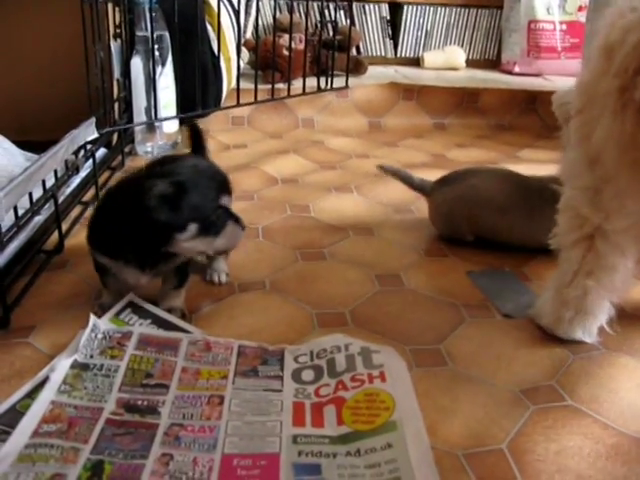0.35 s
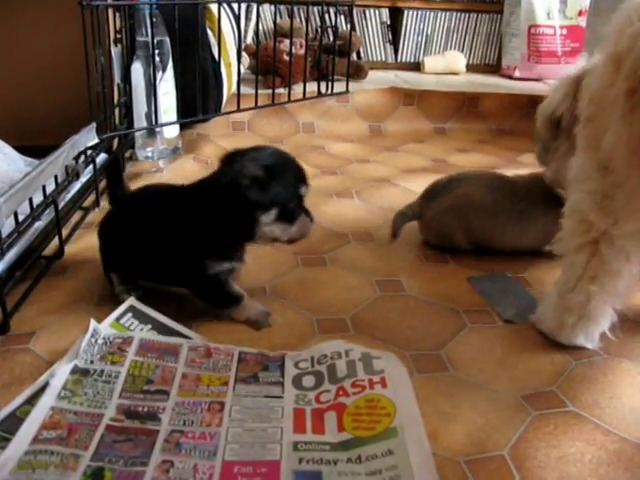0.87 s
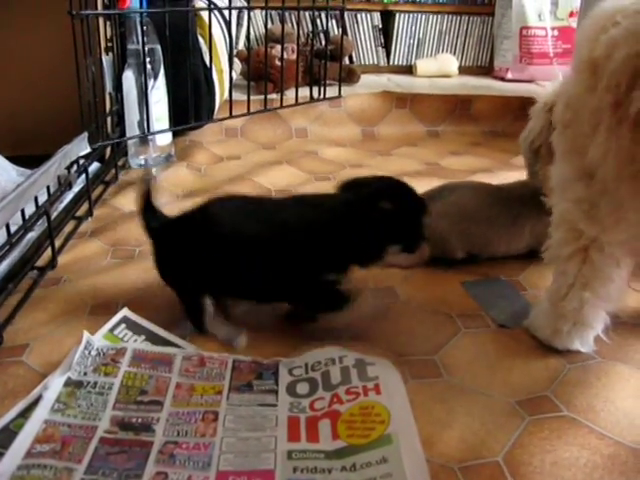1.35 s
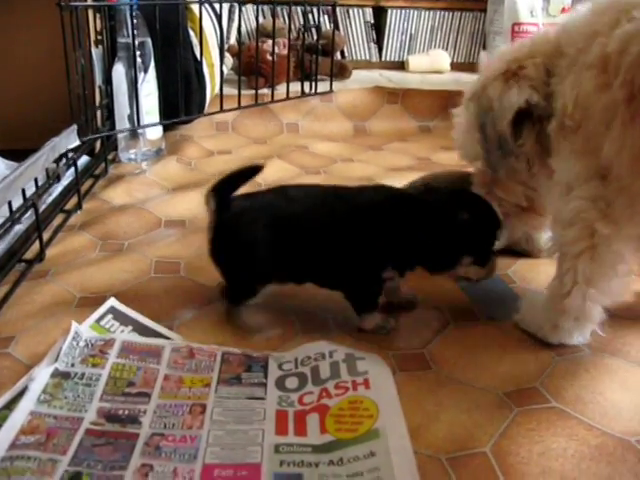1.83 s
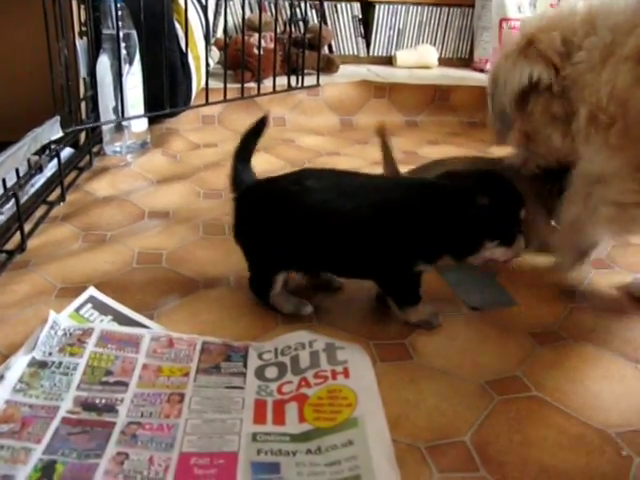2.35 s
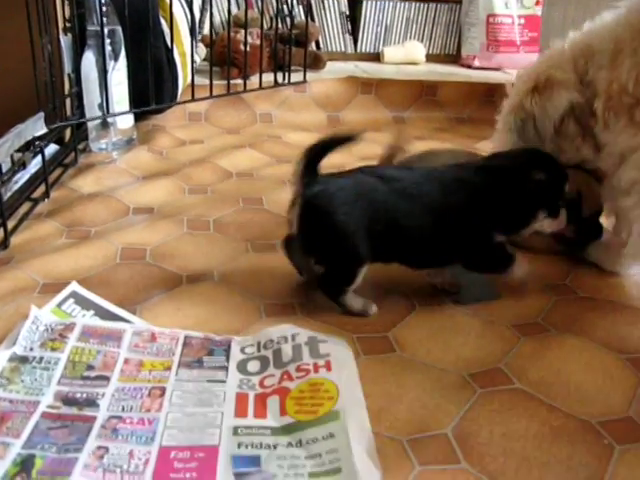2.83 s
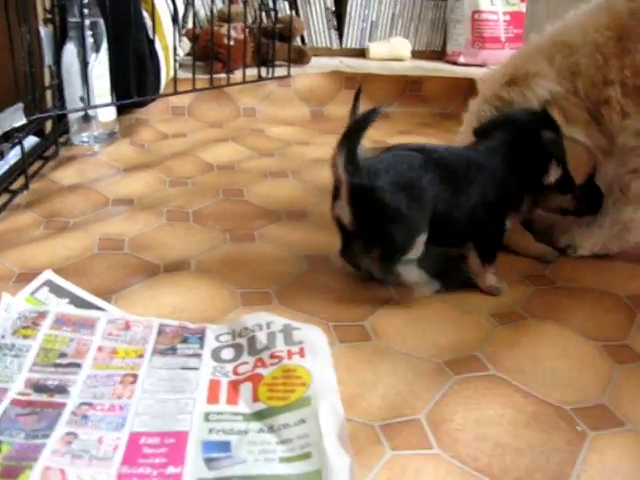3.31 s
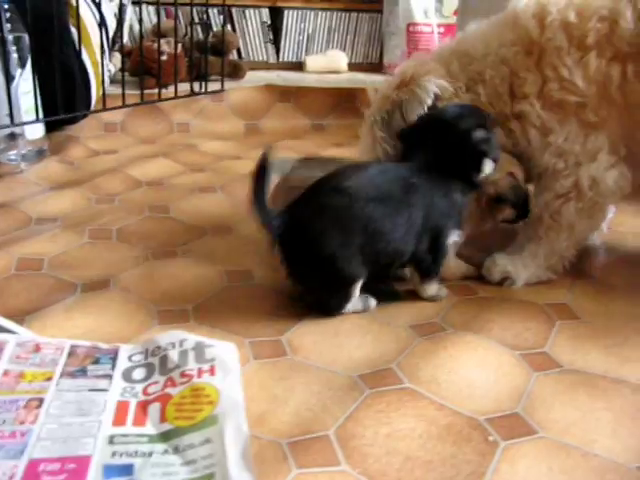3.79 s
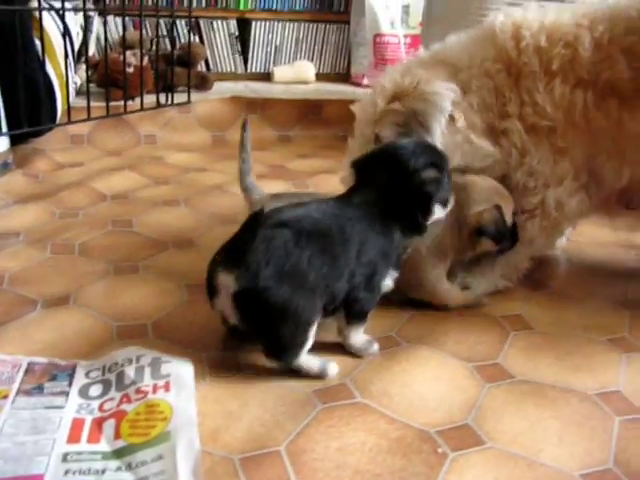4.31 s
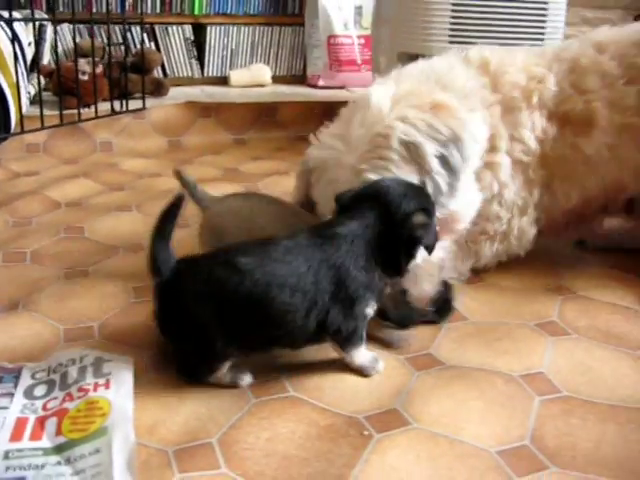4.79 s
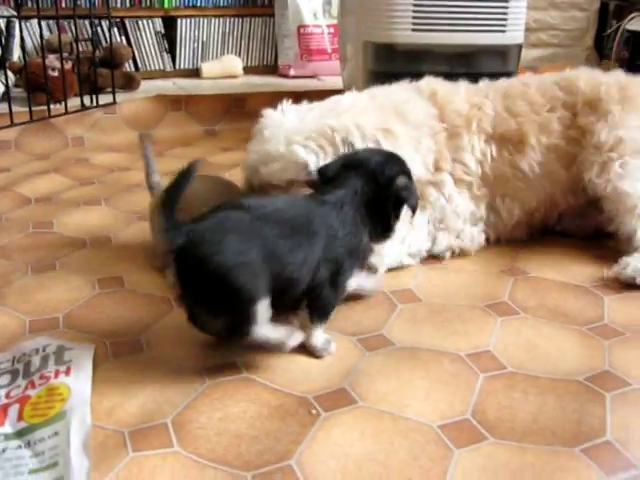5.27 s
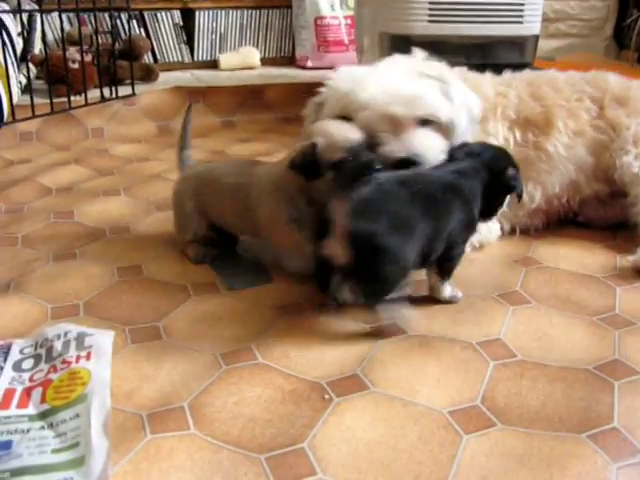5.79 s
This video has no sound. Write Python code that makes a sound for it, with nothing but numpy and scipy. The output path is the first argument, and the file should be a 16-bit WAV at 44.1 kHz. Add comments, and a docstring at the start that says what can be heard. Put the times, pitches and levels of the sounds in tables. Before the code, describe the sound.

Small puppies yip softly indoors amid clicking claws, soft thuds and scuffles on vinyl, peaking in sharp knocks and a wavering cry.

```python
"""Puppies squeak and whine while they tumble around a dog on a vinyl floor in a small room.
Each squeak is a few harmonics on a shaky pitch. Claws tick as short ringing modes, paws thud as
low swings that die fast, and fur and pads scuff as dense noisy grains. The dog sniffs once.
The room adds a short echo tail, and one microphone hisses under it all."""
import sys
import numpy as np
from scipy import signal
from scipy.fft import rfft, irfft
from scipy.io import wavfile
from scipy.ndimage import uniform_filter1d

SR = 44100
rng = np.random.default_rng(int(sys.argv[2]) if len(sys.argv) > 2 else 0)


def gain_from_db(level_db):
    """Turn a decibel level (scalar or array-like) into a linear amplitude factor."""
    decades = np.asarray(level_db, float) / 20
    return 10 ** decades


def file_out(sig):
    """Save sig as 16-bit WAV at sys.argv[1]."""
    # one column per channel
    cols = np.atleast_2d(sig).T
    # limit, then scale
    lim = np.clip(cols, -1, 1)
    pcm = np.round(lim * 32767).astype(np.int16)
    wavfile.write(sys.argv[1], SR, pcm)


N = 260190  # samples, 5.9 s


def evened(x):
    """Scales to rms 1."""
    return x / np.sqrt(np.mean(x ** 2) + 1e-20)


def add(mix, start_s, sound):
    """Mixes a sound in at its start time."""
    part = mix[round(start_s * SR):][:len(sound)]
    part += sound[:len(part)]


def coloured(x, points):
    """Filters by a spectrum of (Hz, dB) points, joined on a log-frequency axis."""
    point_hz, point_db = np.transpose(points)
    hz = np.fft.rfftfreq(len(x), 1 / SR)
    gain_db = np.interp(np.log(hz + 1), np.log(point_hz + 1), point_db)
    return irfft(rfft(x) * gain_from_db(gain_db), len(x))


def wander(n, span):
    """Smooth random drift of rms about 1 that changes over span samples."""
    noise = rng.standard_normal(n + 2000)
    smooth = uniform_filter1d(uniform_filter1d(noise, span), span)
    return evened(smooth)[1000:n + 1000]


def squeak(rows, overtones_db, rasp_db):
    """Tiny vocal folds: a few harmonics on a shaky pitch, fluttering in strength and hoarser toward the end."""
    # samples over which each curve rounds its corners: (pitch, level)
    pitch_ease, level_ease = (160, 300)
    jitter, flutter_db = 0.004, 1.8  # rms share of the pitch; rms dB
    start_s, pitch_hz, level_db = np.transpose(rows)
    t = np.arange(start_s[0], start_s[-1], 1 / SR)
    hz = uniform_filter1d(np.interp(t, start_s, pitch_hz), size=pitch_ease, mode="nearest")
    tone_db = uniform_filter1d(np.interp(t, start_s, level_db), size=level_ease, mode="nearest")
    phase = 2 * np.pi * np.cumsum(hz * (1 + jitter * wander(len(t), 120))) / SR
    progress = (t - start_s[0]) / (start_s[-1] - start_s[0])
    second_db, third_db, fourth_db = overtones_db
    fifth_db = fourth_db - 10
    voice = 0
    for number, db in enumerate([0, second_db, third_db, fourth_db, fifth_db], start=1):
        flutter = gain_from_db(flutter_db * wander(len(t), 200))
        # rasp grows through the call and with the harmonic number
        rasp = gain_from_db(rasp_db) * number * 2 * progress * wander(len(t), 30)
        tone = np.sqrt(2) * gain_from_db(tone_db + db) * np.sin(number * phase)
        voice = voice + (flutter + rasp) * tone
    return start_s[0], voice * signal.windows.tukey(len(t), 0.15)


def puppies():
    """Every squeak at its time, each with its own overtones and hoarseness."""
    # course of each squeak, one list a squeak: start_s [s], pitch_hz [Hz], level_db of the lowest tone [dB rms]
    squeaks = [
        [(0.065, 398, -58), (0.075, 435.1, -55), (0.089, 493, -44.5), (0.101, 556, -45), (0.117, 562, -45.5),
         (0.129, 550, -68), (0.135, 544.9, -56)],
        [(0.94, 826, -57), (0.952, 825, -50.5), (0.988, 967, -44), (0.996, 976, -57), (1.022, 925, -55),
         (1.046, 709, -41), (1.07, 520, -59)],
        [(1.24, 810, -81), (1.252, 824, -39.5), (1.26, 856, -40.5), (1.268, 833.3, -81)],
        [(1.615, 1136, -58), (1.623, 1142, -43.5), (1.649, 1155, -51), (1.663, 1192, -38), (1.677, 1286, -46),
         (1.709, 1196, -53), (1.72, 1204, -66)],
        [(1.785, 693, -50), (1.795, 678, -47), (1.819, 754, -43.5), (1.859, 779, -47), (1.865, 730, -46.5),
         (1.881, 571, -48.5), (1.895, 506, -41)],
        [(2.22, 526, -67), (2.234, 511.5, -49.5), (2.252, 479, -54), (2.296, 590.6, -44.5), (2.31, 615, -51),
         (2.364, 594, -50.5), (2.4, 577, -59)],
        [(2.735, 970, -55), (2.745, 1034, -37), (2.763, 1090, -34.5), (2.791, 1234, -39.5),
         (2.825, 1194, -42.5), (2.853, 975, -39.5), (2.87, 900, -63)],
        [(3.04, 730.0, -53), (3.052, 729, -38), (3.076, 772, -35), (3.102, 565.4, -43), (3.148, 583.5, -51),
         (3.152, 568, -48), (3.18, 507, -51)],
        [(4.485, 890, -64), (4.493, 836, -38.5), (4.511, 695, -35.5), (4.535, 690, -34), (4.547, 747, -60),
         (4.559, 703, -43), (4.575, 680.5, -63)],
        [(4.92, 657, -48), (4.928, 689, -37.5), (4.946, 604, -47), (4.96, 670, -38.5), (4.966, 600, -54),
         (4.99, 592, -46)],
        [(5.355, 1080, -50), (5.375, 1048, -40), (5.421, 1125, -51), (5.441, 1062, -39), (5.471, 840, -37.5),
         (5.515, 896, -34.5), (5.58, 917, -81)],
        [(5.825, 1260, -48), (5.837, 1274, -52), (5.863, 1313, -40), (5.867, 1333, -49), (5.875, 1410, -37),
         (5.887, 1510, -46), (5.9, 1450, -35)],
        [(1.595, 1346, -61), (1.613, 1337, -43), (1.64, 1380, -58)],
        [(0.155, 1669, -76), (0.167, 1610, -43), (0.18, 1580, -73)],
        [(3.462, 847, -59), (3.475, 798, -45), (3.495, 746, -48.5), (3.51, 800, -45.5), (3.527, 970, -55)],
        [(3.59, 1206, -62), (3.61, 1050, -43), (3.63, 926, -44), (3.655, 958, -39)],
        [(3.535, 612, -56), (3.56, 540, -53), (3.61, 546, -49), (3.655, 458, -58)],
        [(4.08, 1126, -56), (4.096, 982, -38.5), (4.128, 996, -40), (4.136, 973, -54), (4.144, 1110, -39),
         (4.156, 1117, -44), (4.19, 950, -40), (4.204, 953, -35), (4.23, 1002, -42), (4.286, 954, -62),
         (4.3, 1116, -62)],
    ]
    # strength of the overtones, one row a squeak, against the lowest tone:
    # second_db [dB], third_db [dB], fourth_db [dB]
    overtones = [(-4, -27, -13.5), (-10, -22, -26), (-18, -26, -30), (-0.5, -28, -36), (-1.5, -6, -9.5),
                 (4.5, -11, -5.5), (-9, -20, -35), (-7.5, -10.5, -15), (-9, -24, -25), (-12, -16, -26),
                 (-8.5, -17, -32), (-14.5, -24, -27), (-14, -30, -34), (-20, -30, -34), (-21, -28, -34),
                 (-15, -23, -32), (-2.5, -18, -26), (-0.5, -26, -28)]
    # hoarseness, one value a squeak: rasp_db of the lowest tone at mid-call, against that tone [dB]
    hoarseness = [-20, -13, -24, -17, -26, -20, -15, -7, -18, -14, -19, -18, -22, -22, -22, -15, -6, -19]
    out = np.zeros(N)
    for rows, overtones_db, rasp_db in zip(squeaks, overtones, hoarseness):
        add(out, *squeak(rows, overtones_db, rasp_db))
    return out


def ring(hz, width_hz, t):
    """One damped mode starting with a pull; a wider mode dies faster."""
    return -np.exp(-np.pi * width_hz * t) * np.cos(2 * np.pi * hz * t)


def ticks():
    """Claws hit vinyl: each strikes a slightly different spot, so the modes shift."""
    # claw strikes: start_s [s], body_db peak [dB], edge_db peak of the bright edge [dB]
    strikes = [(0.2846, -38, -25), (0.7353, -35, -27), (0.9715, -37, -24), (1.0901, -40, -26),
               (1.4083, -35, -30), (1.4793, -24, -16), (1.5846, -29, -18), (1.7251, -34, -18),
               (2.1004, -37, -29), (2.2982, -16, -18), (2.3022, -25, -19), (2.4351, -24, -27),
               (2.4413, -15, -16), (2.5766, -14, -20), (2.5837, -15, -18), (2.8053, -13, -18),
               (2.9334, -15, -17), (2.9392, -13, -17), (3.1216, -23, -23), (3.34, -33, -30),
               (3.3748, -28, -32), (3.6108, -22, -26), (3.6617, -7, -9), (3.6656, -9, -9),
               (4.1509, -37, -23), (4.3598, -47, -25), (4.4357, -34, -35), (4.5723, -27, -30),
               (4.6495, -30, -18), (4.6867, -29, -30), (4.7792, -18, -30), (4.7824, -25, -25),
               (4.8533, -31, -37), (4.8643, -13, -19), (4.8676, -11, -17), (4.9102, -26, -32),
               (5.5222, -29, -19), (5.7, -34, -22)]
    # ringing modes of claw and vinyl: mode_hz before the shift [Hz], width_hz [Hz], relative_db [dB]
    modes = [(1900, 390, 5), (3000, 470, 15), (5050, 730, 2)]
    detune = 0.19  # typical shift of a mode, as a share of its pitch
    contact_s = 0.00004
    out, t = np.zeros(N), np.arange(300) / SR
    contact = np.exp(-(t[:12] / contact_s - 2) ** 2)  # the blow is brief but not instant
    contact /= contact.sum()
    edge = ring(7600, 3600, t)
    for start_s, body_db, edge_db in strikes:
        body = np.zeros(len(t))
        for mode_hz, width_hz, relative_db in modes:
            shifted_hz = mode_hz * (1 + detune * rng.standard_normal())
            body += gain_from_db(relative_db) * ring(shifted_hz, width_hz, t)
        body = np.convolve(body, contact)[:len(t)]
        body /= abs(body).max()
        add(out, start_s, gain_from_db(body_db) * body + gain_from_db(edge_db) * edge)
    return out


def thuds():
    """A soft pad or elbow pushes the floor: a low swing that dies within a few cycles."""
    # landings: start_s [s], level_db before the soft start and decay [dB], thud_hz [Hz],
    # cycles for the decay to reach 1/e [cycles]
    landings = [(.286, -33, 500, 0.8), (.784, -31, 860, 1.8), (1.478, -30, 490, 1.1),
                (1.726, -29.5, 340, 0.66), (1.971, -23, 317, 1.15), (2.0991, -17.5, 510, 0.46),
                (2.134, -31.5, 504, 1.1), (2.689, -28.5, 302, 0.83), (2.766, -34.5, 281, 1.6),
                (2.804, -15.5, 610, 0.76), (3.024, -28, 368, 0.68), (3.34, -25, 340, 0.7),
                (3.509, -27, 385, 0.89), (3.926, -28, 626, 1), (3.966, -22, 710, 0.9),
                (4.0588, 4, 520, 0.2), (4.0622, -7.5, 560, 0.35), (4.371, -37, 463, 1.5),
                (4.648, -28, 423, 0.77), (4.78, -25, 490, 1.05), (5.701, -37, 577, 1.9)]
    rise_s = 0.0015
    out, t = np.zeros(N), np.arange(1500) / SR
    for start_s, level_db, thud_hz, cycles in landings:
        decay = np.exp(-t * thud_hz / cycles)
        soft_start = 1 - np.exp(-t / rise_s)
        swing = np.sin(2 * np.pi * thud_hz * t) * decay * soft_start
        add(out, start_s, gain_from_db(level_db) * swing)
    return out


def scuffs():
    """Pads or fur slide in dense stick-slip grains of uneven size; a low grit and a high hiss share them."""
    # slides: peak_s [s], swell_s [s], fade_s [s], grit_db at the peak [dB rms], hiss_db at the peak [dB rms]
    slides = [(0.285, 0.0036, 0.018, -48, -43), (.53, 0.052, 0.049, -65, -80),
              (.646, 0.041, 0.087, -53, -49.5), (0.761, 0.049, 0.052, -45, -40),
              (.968, 0.01, 0.042, -59, -58), (1.09, 0.2, 0.019, -53.5, -50.5),
              (1.252, 0.058, 0.16, -53, -53.5), (1.401, 0.049, 0.039, -55, -43.5),
              (1.478, 0.0017, 0.026, -39, -32.5), (1.583, 0.12, 0.037, -47, -51),
              (1.66, 0.21, 0.076, -77, -45.5), (1.76, 0.13, 0.054, -53.5, -48.5),
              (1.945, 0.15, 0.05, -50, -47), (2.1, 0.0027, .015, -46, -42),
              (2.189, 0.072, 0.027, -34.5, -38.5), (2.25, 0.041, 0.28, -51.5, -48),
              (2.298, 0.0037, 0.054, -42, -66), (2.456, 0.018, 0.091, -37.5, -38.5),
              (2.517, 0.076, 0.03, -34.5, -40), (2.583, 0.0033, 0.043, -32, -50),
              (2.69, 0.087, 0.055, -52.5, -60), (2.744, 0.12, 0.11, -43, -48),
              (2.81, 0.0027, 0.059, -32, -44), (2.942, 0.016, 0.067, -30, -40),
              (3.0, 0.033, 0.047, -58, -37), (3.09, 0.04, 0.9, -49.5, -53.5),
              (3.236, 0.015, 0.034, -77, -42.5), (3.336, 0.01, 0.065, -43.5, -50),
              (3.53, 0.056, 0.078, -41, -44), (3.665, 0.0037, 0.0063, -22, -25),
              (3.678, 0.0089, 0.049, -33.5, -36.5), (3.962, 0.027, .1, -50.5, -87),
              (4.025, 0.14, 0.092, -40, -45), (4.438, 0.014, 0.014, -42.5, -55),
              (4.57, 0.13, 0.16, -48, -45), (4.7, 0.052, 0.12, -49.5, -54.5),
              (4.782, 0.002, 0.063, -41.5, -47.5), (4.87, 0.0051, 0.02, -27, -35),
              (4.892, 0.028, 0.097, -41.5, -43), (5.2, 0.6, 0.051, -61, -58), (5.46, 0.6, 0.33, -52, -55.5),
              (5.528, 0.023, 0.017, -44, -43.5), (5.699, 0.0027, 0.16, -57, -52)]
    # spectrum of the low grit: tone_hz [Hz], relative_db [dB]
    grit_tone = [(150, -37), (400, -1), (1000, -3), (2500, 0.5), (5000, -2), (8000, -9.5), (16000, -56)]
    # spectrum of the high hiss: tone_hz [Hz], relative_db [dB]
    hiss_tone = [(2000, -47), (5000, -15.5), (8000, -2.5), (11500, 6.5), (14000, -6.5), (16000, -7)]
    grains_per_s, spread_db, judder_db = 20000, 1.5, 2.0
    slide_db = 20  # the level change over one swell or one fade
    hit = rng.random(N) < grains_per_s / SR
    size = gain_from_db(spread_db * np.minimum(rng.exponential(1, N), 4))
    grains = hit * rng.standard_normal(N) * size
    # the slide catches and lets go
    grit = evened(coloured(grains * gain_from_db(judder_db * wander(N, 300)), grit_tone))
    hiss = evened(coloured(grains * gain_from_db(judder_db * wander(N, 300)), hiss_tone))
    t, out = np.arange(N) / SR, np.zeros(N)
    for peak_s, swell_s, fade_s, grit_db, hiss_db in slides:
        first = max(round((peak_s - 2 * swell_s) * SR), 0)
        near = slice(first, round((peak_s + 2 * fade_s) * SR))
        away = np.maximum((peak_s - t[near]) / swell_s, (t[near] - peak_s) / fade_s)
        rub = gain_from_db(grit_db) * grit[near] + gain_from_db(hiss_db) * hiss[near]
        out[near] += gain_from_db(-slide_db * away) * rub
    return out


def sniff():
    """The dog draws one soft breath through its nose: coloured noise that swells and fades."""
    # spectrum of the nose noise: tone_hz [Hz], relative_db [dB]
    nose_tone = [(2500, -30), (4200, -6), (5500, 0), (7000, -6), (10000, -30)]
    start_s, length_s, level_db = 5.07, 0.15, -53  # level before the swell and fade
    out, n = np.zeros(N), round(length_s * SR)
    breath = evened(coloured(rng.standard_normal(SR // 2), nose_tone))[:n]
    add(out, start_s, gain_from_db(level_db) * breath * np.hanning(n))
    return out


def room(x):
    """Room echoes as sparse taps of random sign, each band dying at its own speed."""
    # echo decay by pitch: band_hz [Hz], t60_s, the time to fall by 60 dB [s]
    decay = [(300, 0.14), (1000, 0.24), (3000, 0.19), (10000, 0.067)]
    taps = np.zeros(SR // 2)
    at = np.arange(120, SR // 2 - 20, 20)
    taps[at + rng.integers(0, 20, len(at))] = rng.choice([-1., 1.], len(at))
    hz, t, bands = signal.stft(taps, SR, nperseg=128)
    band_hz, t60_s = np.transpose(decay)
    fall_db = -60 * t / np.interp(hz, band_hz, t60_s)[:, None]
    tail = signal.istft(bands * gain_from_db(fall_db), SR, nperseg=128)[1]
    return signal.fftconvolve(x, tail / np.linalg.norm(tail))[:N]


def air():
    """Room air and microphone hiss: steady coloured noise whose low and high parts waver apart."""
    # spectrum of the hush: tone_hz [Hz], relative_db [dB per Hz]
    hush_tone = [(15, -44), (25, -67), (43, -16), (190, -1), (575, 1), (695, -0.5), (840, 2.5), (1040, -2),
                 (1260, -2.5), (5140, -9.5), (11600, -9.5), (14800, -16), (16000, -35)]
    level_db, swell_db, split_hz = -51.5, 1.66, 4000  # rms level before the waver; rms waver
    hush = evened(coloured(rng.standard_normal(N), hush_tone))
    low = signal.sosfiltfilt(signal.butter(2, split_hz, fs=SR, output="sos"), hush)
    high = hush - low
    wavering = gain_from_db(swell_db * wander(N, 2000)) * low + gain_from_db(swell_db * wander(N, 2000)) * high
    return gain_from_db(level_db) * wavering


def microphone(x):
    """The small capsule loses both ends of the spectrum."""
    low_cut = signal.butter(2, 185, "high", fs=SR, output="sos")
    high_cut = signal.butter(6, 14300, fs=SR, output="sos")
    return signal.sosfilt(np.vstack([low_cut, high_cut]), x)


def scene():
    """Voices and floor sounds, each with its share of the room, then the sniff and the hiss."""
    pups, hits, pads, rubs = puppies(), ticks(), thuds(), scuffs()
    to_room = gain_from_db(-12) * pups + gain_from_db(-13.0) * hits + gain_from_db(-11.5) * pads + gain_from_db(-16.5) * rubs
    mono = microphone(pups + hits + pads + rubs + sniff() + room(to_room)) + air()
    return np.array([mono, mono])


def top_cut(x):
    """Nothing passes above the cut-off."""
    return signal.sosfilt(signal.butter(12, 16830, fs=SR, output="sos"), x)


def record(dry):
    """Delivers the one microphone's sound on both channels."""
    return top_cut(dry)


dry = scene()
out = record(dry)
file_out(out)
```